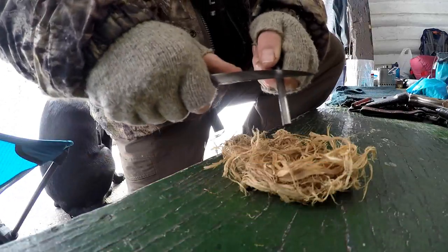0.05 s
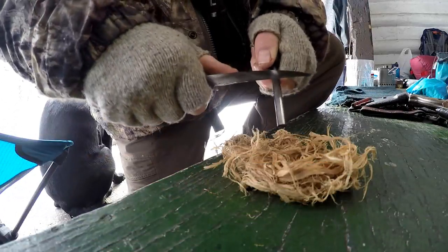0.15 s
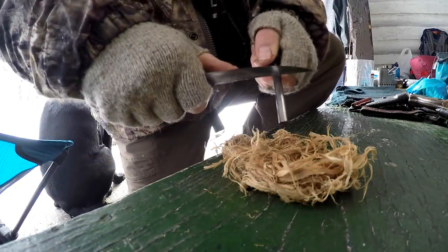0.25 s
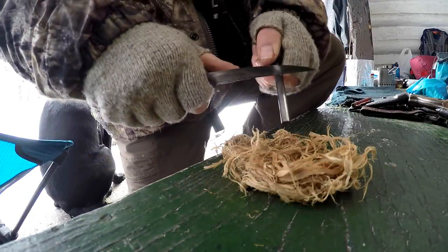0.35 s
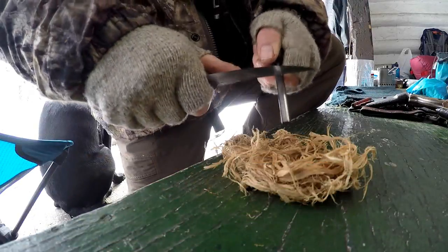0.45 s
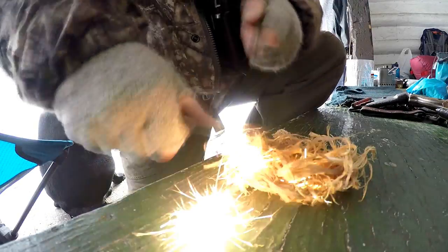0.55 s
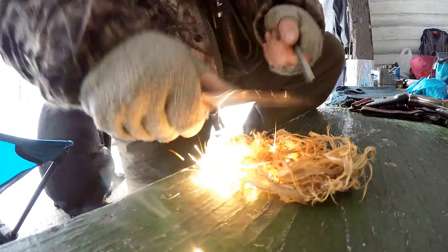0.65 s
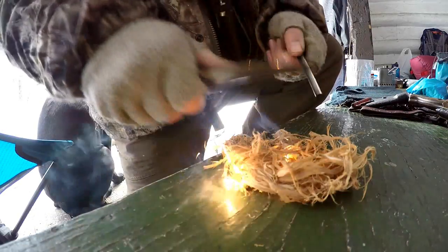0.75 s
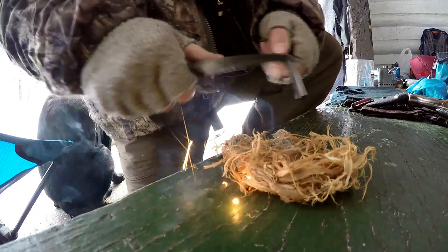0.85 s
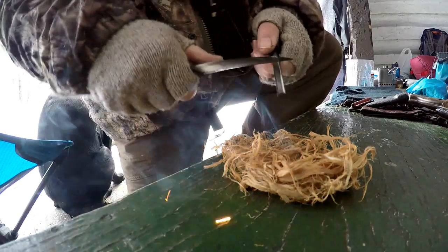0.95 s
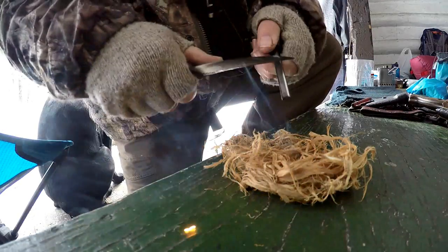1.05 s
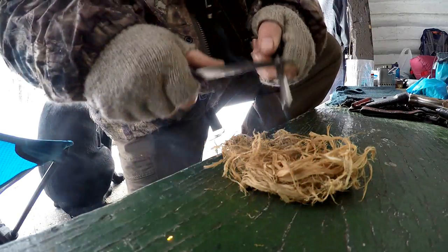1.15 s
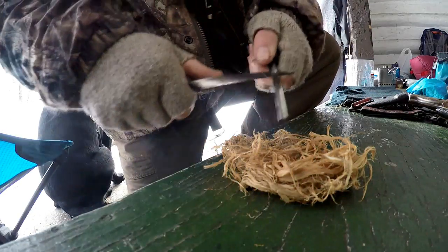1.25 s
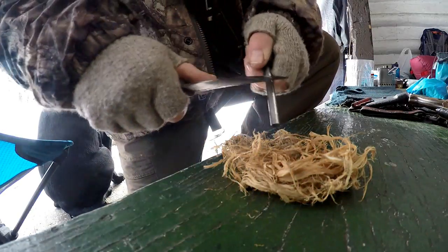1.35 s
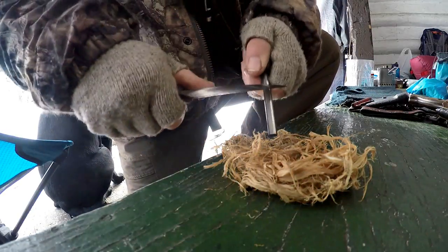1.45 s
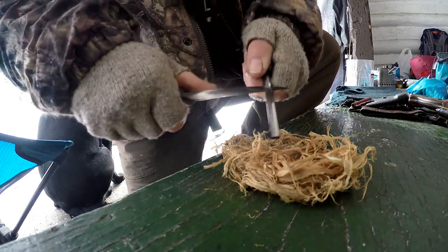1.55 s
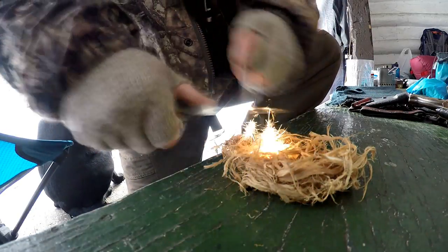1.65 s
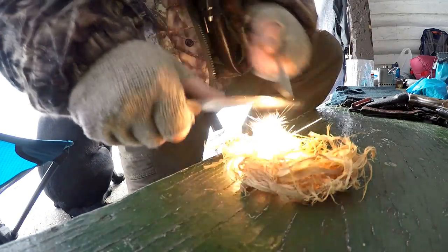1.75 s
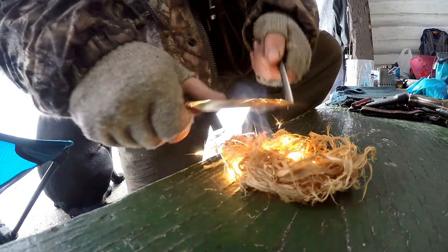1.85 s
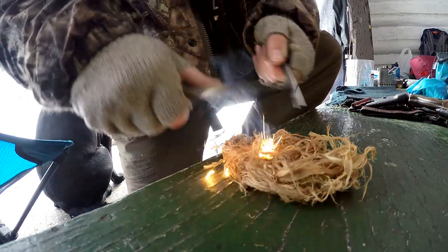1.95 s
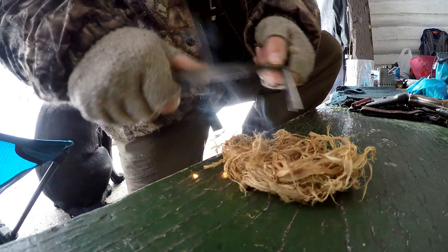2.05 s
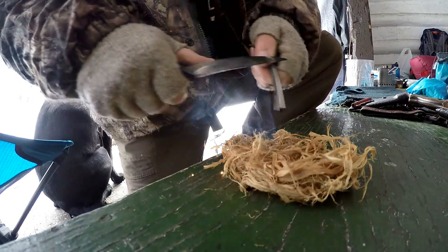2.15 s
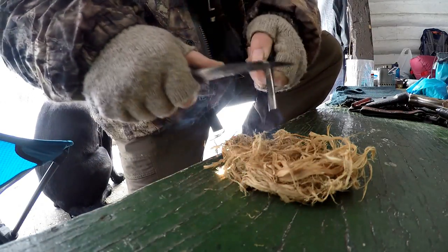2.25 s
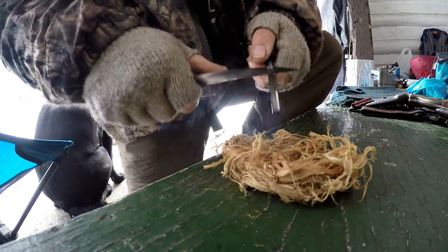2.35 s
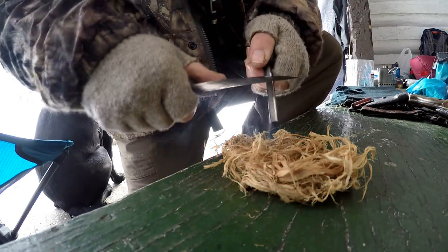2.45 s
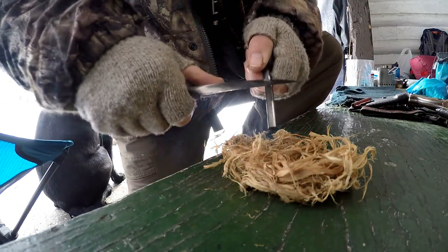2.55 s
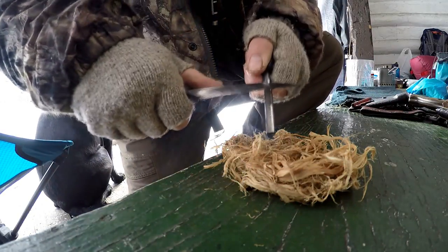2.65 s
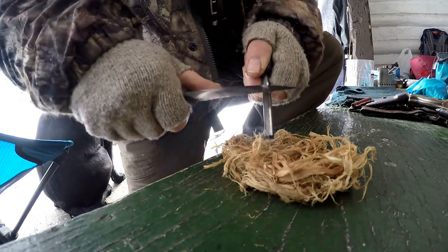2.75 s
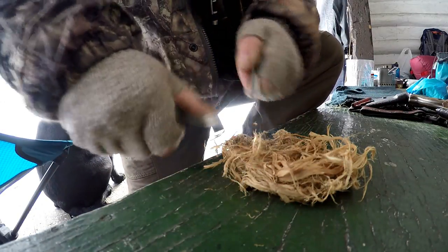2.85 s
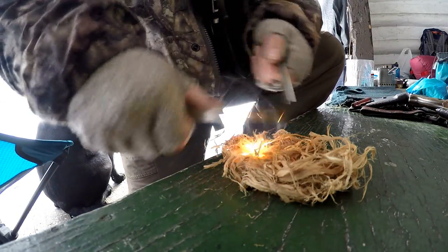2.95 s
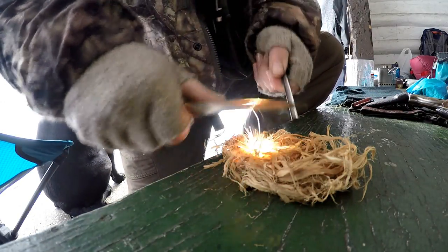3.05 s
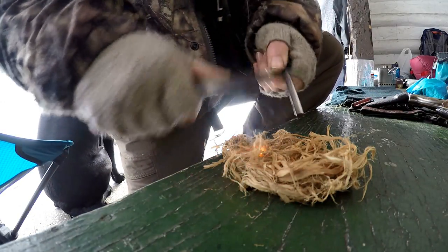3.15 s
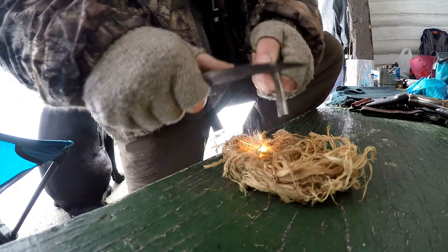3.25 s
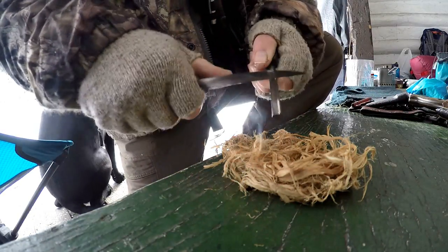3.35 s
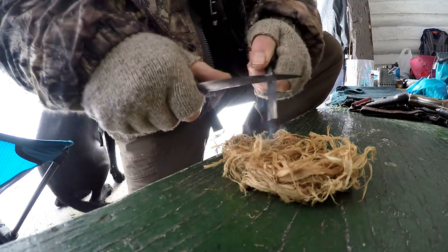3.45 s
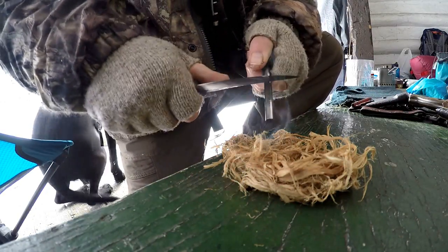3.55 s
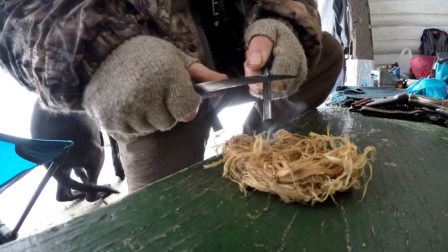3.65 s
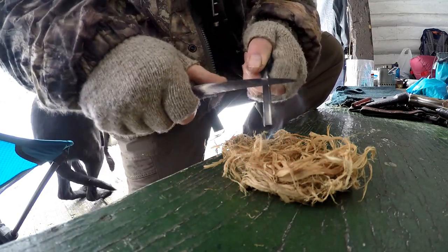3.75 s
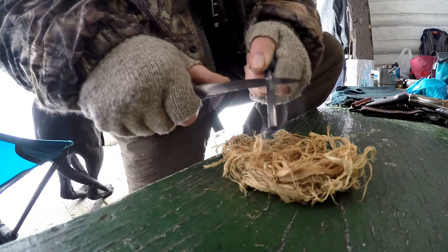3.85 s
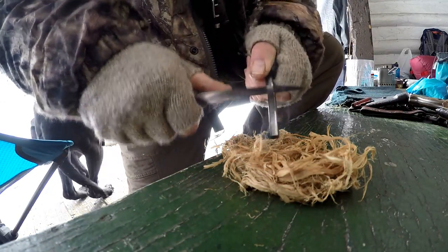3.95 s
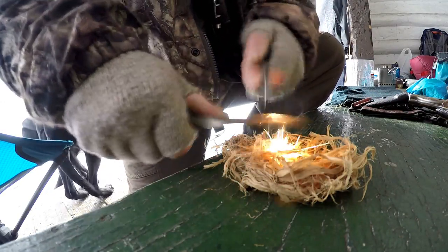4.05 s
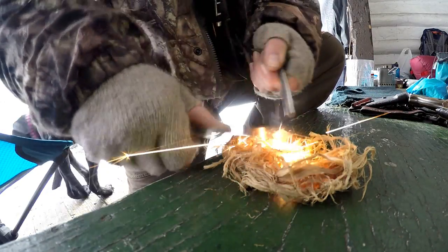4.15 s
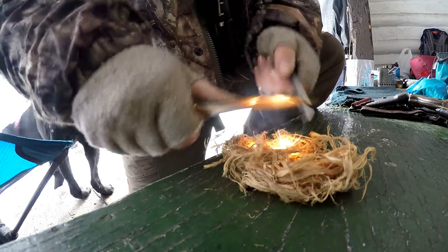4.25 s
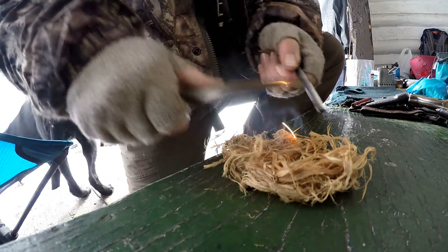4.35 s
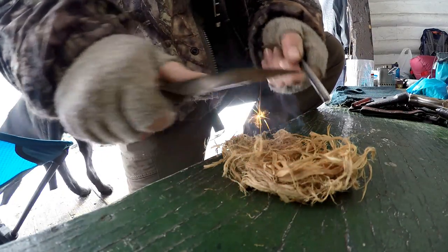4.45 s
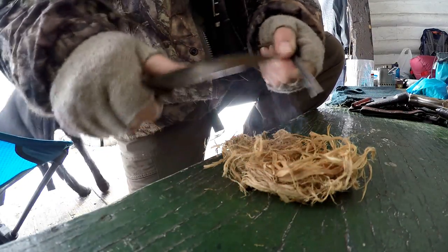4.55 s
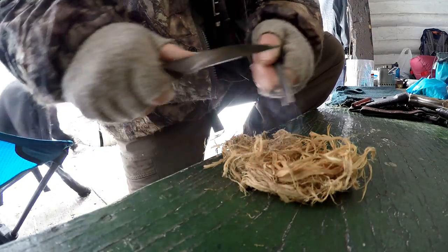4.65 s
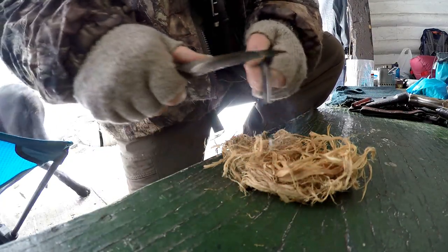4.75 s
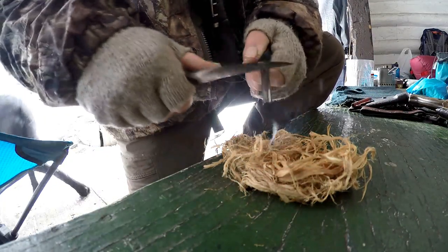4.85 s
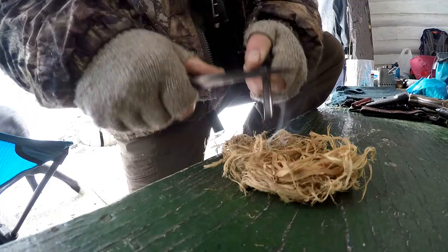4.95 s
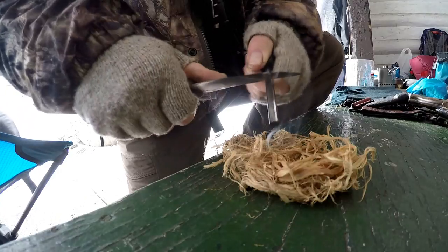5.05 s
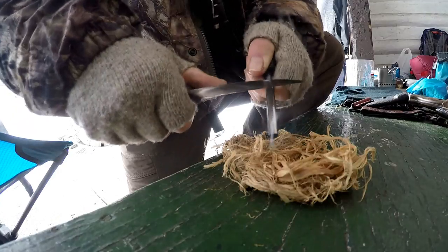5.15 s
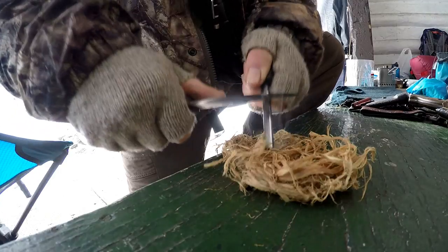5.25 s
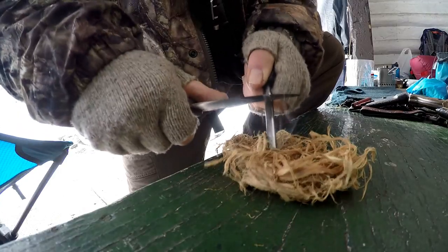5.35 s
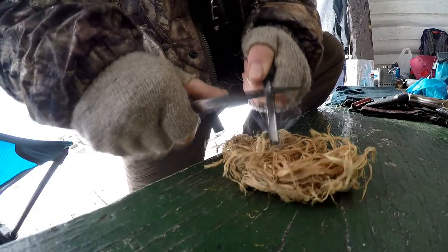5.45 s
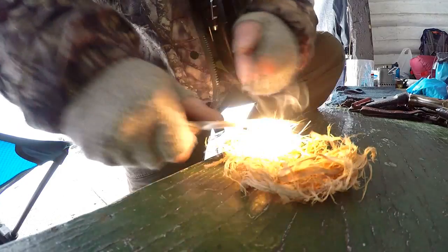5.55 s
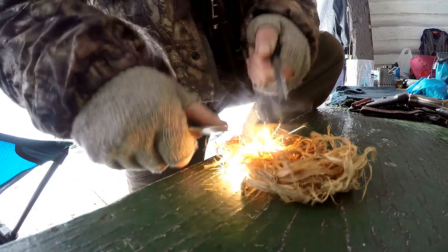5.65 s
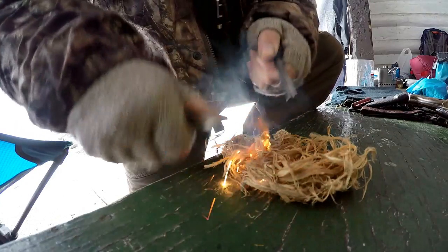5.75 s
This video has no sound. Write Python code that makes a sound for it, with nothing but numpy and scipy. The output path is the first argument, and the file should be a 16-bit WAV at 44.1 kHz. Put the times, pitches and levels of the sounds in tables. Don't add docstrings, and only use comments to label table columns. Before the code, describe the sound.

A blade scrapes sharply down a fire-starting rod five times, sparks crackling and sputtering close up over a quiet outdoor rumble.

```python
import sys
import numpy as np
from scipy import signal
from scipy.io import wavfile
from scipy.ndimage import uniform_filter1d, map_coordinates

SR = 44100
rng = np.random.default_rng(int(sys.argv[2]) if len(sys.argv) > 2 else 0)


def int16_out(signal):
    q = np.round(np.clip(np.atleast_2d(signal).T, -1, 1) * 32767)
    wavfile.write(sys.argv[1], SR, q.astype(np.int16))


def undo_db(level):
    steps = np.asarray(level, float) / 20
    return 10 ** steps


N = 255780


def evened(x):
    return x / np.sqrt(np.mean(x ** 2) + 1e-20)


def read(points, hz):
    f, value = np.transpose(points)
    return np.interp(np.log(hz + 1), np.log(f + 1), value)


def coloured(x, points):
    db = read(points, abs(np.fft.fftfreq(8192, 1 / SR)))
    log_gain = np.log(undo_db(np.maximum(db, -100)))
    taps = np.fft.ifft(np.exp(np.conj(signal.hilbert(log_gain)))).real[:4096]
    return signal.oaconvolve(x, taps)[:len(x)]


def small(x, hz):
    return signal.sosfilt(signal.butter(2, hz, "highpass", fs=SR, output="sos"), x)


def ring(x, modes):
    out = np.zeros(len(x))
    for k, (hz, width, db) in enumerate(modes):
        r = np.exp(-np.pi * max(width, 30) / SR)
        poles = [1, -2 * r * np.cos(2 * np.pi * hz / SR), r * r]
        out += (-1) ** k * undo_db(db) * signal.lfilter([1 - r, 0, r - 1], poles, x)
    return out


LOW_HZ, HIGH_HZ = 2450, 7200


def bands(x):
    edges = [([LOW_HZ, HIGH_HZ], "bandpass"), (LOW_HZ, "lowpass"), (HIGH_HZ, "highpass")]
    filters = [signal.butter(3, hz, kind, fs=SR, output="sos") for hz, kind in edges]
    return np.array([evened(signal.sosfilt(sos, x)) for sos in filters])


def wander(size):
    return evened(uniform_filter1d(uniform_filter1d(rng.standard_normal(N), size), size))


def grit(per_s, spread_db, flutter_db, flutter_size):
    size = undo_db(spread_db * np.minimum(rng.exponential(1, N), 4)) * rng.choice([-1., 1.], N)
    return size * (rng.random(N) < per_s / SR) * undo_db(flutter_db * wander(flutter_size))


def drifting(points, patchy_db):
    frames, hz = N // 512 + 5, np.fft.rfftfreq(2048, 1 / SR)
    a, b, patches = rng.standard_normal((frames, 1025, 3)).T
    patches = uniform_filter1d(patches, size=14, axis=0)
    patches = evened(uniform_filter1d(patches, size=6, axis=1))
    z = (a + 1j * b) * undo_db(read(points, hz)[:, None] + patchy_db * patches)
    return evened(signal.istft(z, nperseg=2048, noverlap=1536)[1][:N])


def swells(rows, share, rise_db, cut, fall_shape):
    t, db = np.arange(0, N + 16, 16) / SR, -140.
    for s, top_db, rise_ms, fall_ms in rows:
        early = np.maximum(s - t, 0) * 1000 / rise_ms
        late = np.maximum(t - s, 0) * 1000 / fall_ms
        slope = share * (rise_db * early + 20 * late ** fall_shape)
        onset = np.minimum(early, 9) ** cut
        before = np.where(t < s, db, -140)
        db = np.maximum(before, top_db - slope - onset)
    return np.interp(np.arange(N) / SR, t, undo_db(db))


def bursts(rows, colour, boost_db):
    out, t = np.zeros(N + 2000), np.arange(2000) / SR
    noises = rng.standard_normal((len(rows), 2000))
    for (s, db, low_db, high_db, ms, *hz), noise in zip(rows, noises):
        decay = np.exp(-(t * 1000 / max(ms, .3)) ** 1.08)
        rattle = noise * decay * np.minimum(t / 0.00047, 1)
        parts = bands(colour(rattle, *hz))
        parts /= abs(parts).max(1)[:, None]
        out[round(s * SR):][:2000] += undo_db(db + boost_db) * (undo_db([0, low_db, high_db]) @ parts)
    return out[:N]


# f/Hz, level/dB per Hz
YARD_COLOUR = [(12, -50), (22, 0), (67, -6), (100, -11), (270, -22), (700, -27), (950, -29.5), (1200, -34),
               (2900, -39.5), (4000, -39.5), (6500, -44), (12400, -49.5), (14700, -50), (16000, -64)]
YARD_DB = -51.5


def yard():
    return undo_db(YARD_DB) * drifting(YARD_COLOUR, 2.2)


WHINE_HZ, WHINE_DB = 14175, -81.5
WHINE_PER_S, WHINE_LAG = 29.965, .78


def whine():
    t = np.arange(N) / SR
    gate = uniform_filter1d(1. * ((t * WHINE_PER_S + WHINE_LAG) % 1 < .5), size=100)
    return undo_db(WHINE_DB) * gate * np.sin(2 * np.pi * WHINE_HZ * t)


# strongest t/s, level/dB, rise/ms, fall by 20 dB/ms
RUSTLE = [
    (0.0, -63.5, 10, 2500),
    (.95, -55.5, 350, 1000),
    (1.87, -54, 180, 190),
    (2.41, -55.5, 420, 300),
    (3.02, -56, 130, 1002),
    (4.31, -53.5, 500, 505),
    (5.01, -57, 700, 900),
    (5.69, -39.5, 94, 71),
]
# f/Hz, level/dB per Hz
RUSTLE_COLOUR = [(180, -44), (330, -5), (750, -3.5), (1300, -19.5), (1850, -14), (2440, -20.5),
                 (3200, -15.5), (4100, -13.5), (4900, -19), (5600, -19), (8000, -26.5), (12900, -29),
                 (15200, -33), (16000, -29)]
RUSTLE_FLOOR_DB = -67


def rustle():
    stirring = np.maximum(swells(RUSTLE, 0.76, 16, 3, 0.84), undo_db(RUSTLE_FLOOR_DB))
    fibres = grit(8000, 2.2, 0.69, flutter_size=300)
    return stirring * evened(coloured(fibres, RUSTLE_COLOUR))


# start t/s, tip reached t/s, pressure level/dB, relative rod chatter level/dB
STROKES = [
    (0.506, 0.535, -39, 0),
    (1.66, 1.685, -39, 1),
    (2.844, 2.868, -39.5, -6),
    (4.007, 4.039, -42, -8.5),
    (5.5, 5.532, -37.5, -2.5),
]
# length/ms, first level/dB, last level/dB, chatter level/dB
SKIDS = [
    (24, -26, -36.5, -31.5),
    (19.7, -40, -42, -33),
    (33.9, -44, -38, -30.5),
    (41, -41, -39, -37.5),
    (25.6, -34, -42, -33),
]
BITE_S, BITE_DB, DRAG_DB = 0.0078, -25, -2.5
CHATTER_GROWS_DB, DRAG_BRIGHT_DB = 2.5, (-13, -5, -2.5)
CATCH_S, SKID_CHATTER_FADE_DB, SKID_BRIGHT_DB = 0.0051, -7, (-5, -11)


def hand():
    db = np.full((3, N), -140.)
    for (start, tip, drag_db, chatter_db), (ms, first_db, last_db, jolt_db) in zip(STROKES, SKIDS):
        s = [start, start + BITE_S, tip, tip + CATCH_S, tip + ms / 1000]
        drag = drag_db + np.array([BITE_DB, DRAG_DB, 0])
        shaking = drag + chatter_db + CHATTER_GROWS_DB * np.array([0, -.5, .5])
        blade = [*drag, first_db, last_db]
        rod = [*shaking, jolt_db, jolt_db + SKID_CHATTER_FADE_DB]
        fizz = [*(drag + DRAG_BRIGHT_DB), *(drag_db + np.array(SKID_BRIGHT_DB))]
        at = np.arange(round(s[0] * SR), round(s[-1] * SR))
        db[:, at] = [np.interp(at / SR, s, c) for c in (blade, rod, fizz)]
    return uniform_filter1d(undo_db(db), size=40, axis=1)


# f/Hz, width/Hz, level/dB
SCRAPE = [(2850, 100, 6), (3940, 180, 7.5), (4440, 310, 2), (5550, 580, 2.5), (8270, 1000, -9.5),
          (8140, 120, -3), (10030, 1400, -4), (11150, 250, 3), (12500, 1000, -4.5)]
# f/Hz, width/Hz, level/dB
CHATTER = [(370, 130, -14.5), (836, 90, 4.5), (1515, 180, -3.5), (2104, 140, -4.5)]


def strokes():
    middle, low, high = hand()
    tearing = grit(14000, 4.2, 0.51, flutter_size=60)
    fine = bands(ring(tearing, SCRAPE) + undo_db(-13) * uniform_filter1d(tearing, size=3))
    chatter = evened(small(ring(grit(2500, 3.16, 2.4, flutter_size=80), CHATTER), 220))
    return middle * fine[0] + low * chatter + high * fine[2]


# t/s, length/ms, peak level/dB, slip rate f/Hz, second overtone level/dB
SQUEALS = [
    (.53, 8.6, -30, 830, -18),
    (.5372, 13, -22.5, 720, 24),
    (1.6845, 11.4, -21.5, 1050, 1.5),
    (2.874, 10.1, -22, 940, -3.5),
    (4.044, 15, -31, 842, -7),
    (5.5315, 12.5, -18.5, 920, 2.5),
]
SQUEAL_GLIDE, SQUEAL_FADE_DB = .06, -3.5


def squeals():
    out, jitter, strength = np.zeros(N), wander(size=30), undo_db(0.48 * wander(size=45))
    for s, ms, db, hz, second_db in SQUEALS:
        at = round(s * SR) + np.arange(round(ms / 1000 * SR))
        glide = 1 + SQUEAL_GLIDE * np.linspace(-.5, .5, len(at))
        turns = np.cumsum(hz * glide * (1 + 0.14 * jitter[at])) / SR
        train = np.zeros(len(at))
        for k, overtone_db in enumerate([0, second_db, -9, -11, -13, -20]):
            lag = .09 * k * k
            train += undo_db(overtone_db) * np.cos(2 * np.pi * ((k + 1) * turns + lag))
        fade = signal.windows.tukey(len(at), .3) * undo_db(np.linspace(0, SQUEAL_FADE_DB, len(at)))
        out[at] += undo_db(db) * train / abs(train).max() * strength[at] * fade
    return small(out, 530)


# t/s, peak level/dB, f/Hz, t60/s
THUMPS = [
    (0.965, -34, 91.5, 0.034),
    (0.566, -26, 45, 0.055),
    (1.72, -42, 59.6, .07),
    (2.916, -38, 54.4, 0.092),
    (2.942, -21, 296, 0.019),
    (5.377, -34, 460, 0.022),
    (5.567, -30, 60, 0.088),
    (5.661, -25, 65.4, 0.35),
]


def thumps():
    out, t = np.zeros(N + SR), np.arange(SR // 2) / SR
    for s, db, hz, t60 in THUMPS:
        swing = np.sin(2 * np.pi * hz * t) * np.minimum(t / 0.0063, 1)
        out[round(s * SR):][:len(t)] -= undo_db(db - 60 * t / t60) * swing
    return out[:N]


def tabletop(x, ms, drift, share):
    late = ms / 1000 * SR * np.exp(drift * wander(size=900))
    return x + share * map_coordinates(x, [np.arange(N) - late], order=3)


# brightest t/s, burning
# level/dB, rise/ms, fall by 20 dB/ms, relative roar level/dB
FLARES = [(.57, -47, 14, 40, 3), (.604, -27, 17.6, 158, -1.5), (.658, -28.5, 12, 33, -1),
          (1.708, -35.5, 12, 160, 0), (1.776, -31.5, 37, 17, -3.5), (1.802, -33.5, 17, 37, 0),
          (2.93, -48.5, 7.5, 60, -2), (2.951, -38, 3.8, 82, -1), (2.973, -36, 5.3, 24, -0.5),
          (4.115, -38.5, 33, 13, -1), (4.148, -40, 8.4, 36, 2.3), (4.183, -45, 12, 11, -5),
          (4.211, -41.5, 30, 34, 3), (5.609, -33.5, 54, 63, .6), (5.688, -41, 94, 25, 0.2),
          (5.706, -30, 15, 11.5, -4),
          (0.699, -48.5, 8, 51, 0), (.78, -58, 50, 20, 2.5), (1.199, -40, 4.2, 46, -2.7),
          (1.258, -61, 30, 110, 2.5), (1.845, -45, 21, 30, -11), (1.867, -40.5, 15, 30, 0.5),
          (1.922, -49.5, 14, 19, 3.5), (2.001, -32.5, 9.2, 15.3, -7.5), (2.308, -48, 8.5, 50, -8),
          (2.333, -52, 3.6, 11, -3), (3.102, -35, 17.4, 25, -2), (3.274, -41, 11.7, 47, -2),
          (4.297, -35, 13, 17, -4.5), (4.493, -59.5, 7.2, 28, 8), (5.764, -46, 11, 18, 3)]
# f/Hz, level/dB per Hz
FIZZ = [(150, -4.5), (900, 1.5), (1150, -11), (1530, -4), (1900, -12), (2500, -15.5), (2850, -7.5),
        (3400, -18), (4000, -6.5), (4250, -10.5), (4600, -6), (5000, -11.5), (7300, -16), (13200, -14.5),
        (15600, -24)]
ROAR_SHARE, BRIGHT_DB, BRIGHT_SHARE = 0.87, -4.5, 1.16


def flares():
    crackle = tabletop(grit(11000, 3.4, 1.4, flutter_size=150), 0.321, 0.16, 0.2)
    burning = sorted(FLARES)
    burns = [row[:4] for row in burning]
    roars = [(s, db + roar_db, *shape) for s, db, *shape, roar_db in burning]
    parts = [(burns, 1), (roars, ROAR_SHARE), (burns, BRIGHT_SHARE)]
    gains = [swells(rows, share, 9.4, 6.1, 0.88) for rows, share in parts]
    return (gains * undo_db([[0], [0], [BRIGHT_DB]]) * bands(coloured(crackle, FIZZ))).sum(0)


# strongest t/s, level/dB, rise/ms, fall by 20 dB/ms
PUSH = [
    (.585, -35, 10, 196),
    (1.734, -31.5, 41, 39),
    (1.792, -37.5, 35, 160),
    (2.916, -39, 36, 131),
    (3.035, -43, 13, 17),
    (4.098, -40.5, 31, 84),
    (4.27, -44, 150, 68),
    (4.344, -45, 15, 24),
    (5.582, -44, 30, 43),
    (5.7, -41, 37, 82),
]
# f/Hz, level/dB per Hz
PUSH_COLOUR = [(12, -9), (20, 6), (70, -5.5), (113, -2.5), (134, -14.5), (255, -14.5), (400, -20.5),
               (520, -14), (880, -120)]


def push():
    gain = uniform_filter1d(swells(PUSH, 0.85, 16, 4, 1.4), size=500)
    return gain * drifting(PUSH_COLOUR, 3.0)


# t/s, peak level/dB, relative knock level/dB, length/ms
POPS = [(0.5788, -21.5, -3, 1.7), (0.6075, -20, -34, 0.9), (0.6985, -26.5, -6, 1.8), (0.738, -38, 0, 1.6),
        (0.7728, -49, 6, 2.9), (.835, -41, 1.5, 3), (1.1905, -35.5, 3.5, 1.8), (1.7104, -30, 4, 3.8),
        (1.7725, -19.5, -5.5, 4.5), (1.7984, -22, -4.5, 5.6), (1.8598, -26, -9, 2.2),
        (1.867, -26.5, -1, 4.3), (1.957, -35, 3, 2.3), (1.9803, -36, -21, 1.6), (2.2982, -37.5, -18, 2.8),
        (2.9415, -39, 11.5, 3), (2.9685, -25, -3, 2.8), (3.007, -37, -11, 2.4), (3.0532, -35, -6, 1.7),
        (3.261, -27, 0, 1.1), (3.271, -25, -17, 2.5), (4.0794, -29, -1, 3.9), (4.1475, -26, -0.5, 4.7),
        (4.1574, -31, -5, 2), (4.1884, -25, -5, 1.6), (4.2093, -28.5, -1, 2.8), (4.2584, -36, -0.5, 1.8),
        (4.3311, -35.5, 2, 7), (4.342, -31.5, 1.5, 2.7), (5.7018, -37, 5, 1.1)]
LOUD_DB, POP_BRIGHT_DB, POP_DULLING = -35, -5.5, -0.21


def pops():
    rows = []
    for s, db, knock_db, ms in POPS:
        bright_db = POP_BRIGHT_DB + POP_DULLING * (db - LOUD_DB)
        rows.append((s, db, knock_db, bright_db, ms))
    return bursts(rows, lambda x: coloured(x, FIZZ), -1.4)


# f/Hz, width/Hz, level/dB
STEEL = [(340, 150, -9.5), (780, 110, -0.5), (1480, 146, -6), (2030, 79, -8), (2940, 160, -10),
         (3470, 280, -22), (5170, 970, -6.5), (5450, 220, -2), (6500, 210, -29), (8000, 500, -46),
         (9850, 880, -16), (11300, 600, -16), (12200, 510, -16), (14700, 710, -29)]


def steel(rattle, hz):
    blow = 1.3 * np.linalg.norm(rattle) * (np.arange(len(rattle)) == 20)
    ringing = ring(rattle + blow, STEEL + [(hz, 220, 3.5)])
    return small(ringing + 0.076 * uniform_filter1d(rattle, size=3), 230)


# t/s, peak level/dB, relative knock level/dB, relative brightness level/dB, loudest ring f/Hz
TAPS = [(1.009, -49.5, 8.5, -19, 4000), (1.0539, -35.5, -6, -30, 4000), (1.1957, -36, -1, 7, 4500),
        (2.3392, -17.5, -8.5, -11, 4510), (2.3491, -29.5, -17, 3, 4020), (2.9015, -24, -11, -9, 5740),
        (3.3464, -25.5, -2.5, -14, 4300), (3.3508, -30, -31, -4.5, 4000), (4.8741, -21, -6.5, -14, 4120),
        (4.8853, -35.5, -19, -9, 4020), (5.0167, -55, 6.5, -15, 3000), (5.379, -59, -10, 5, 3400)]
CONTACT_MS = 2.85


def taps():
    return bursts([(*row[:4], CONTACT_MS, row[4]) for row in TAPS], steel, 2.3)


# f/Hz, t60/s
SHELTER = [(250, 0.16), (1700, 0.15), (4600, 0.17), (12000, 0.15)]


def shelter(x):
    echoes = np.zeros(SR // 3)
    at = np.arange(350, len(echoes) - 20, 20)
    echoes[at + rng.integers(0, 20, len(at))] = rng.choice([-1., 1.], len(at))
    hz, t, z = signal.stft(echoes, SR, nperseg=256)
    tail = signal.istft(z * undo_db(-60 * t / read(SHELTER, hz)[:, None]), SR, nperseg=256)[1]
    return signal.fftconvolve(x, tail / np.linalg.norm(tail))[:N]


def scene():
    near = strokes() + squeals() + flares() + taps() + pops()
    under = push() + thumps() + rustle() + yard() + whine()
    return (near + undo_db(-13) * shelter(near) + under)[None]


def top_cut(x):
    return signal.sosfilt(signal.butter(12, 16180, fs=SR, output="sos"), x)


EDGE_HZ = 15280


def record(dry):
    lowpass = signal.firwin(1023, EDGE_HZ, window=("kaiser", 7), fs=SR)
    limited = signal.oaconvolve(dry, lowpass[None], "same")
    return top_cut(limited)


dry = scene()
out = record(dry)
int16_out(out)
```